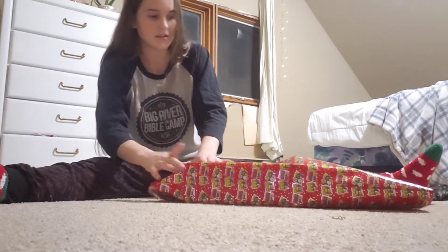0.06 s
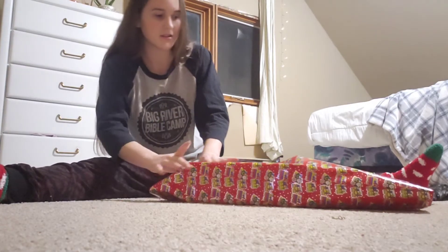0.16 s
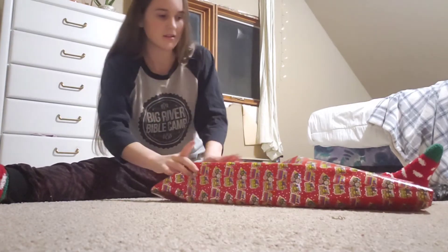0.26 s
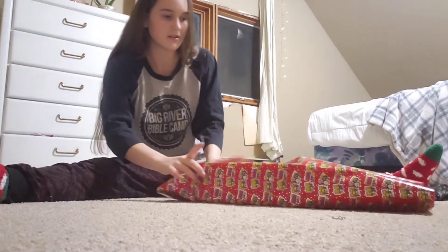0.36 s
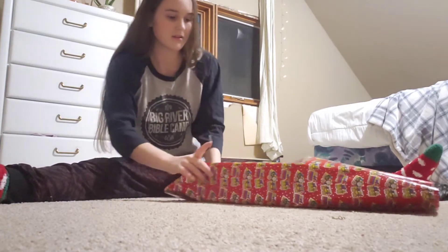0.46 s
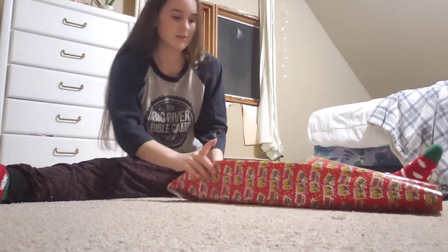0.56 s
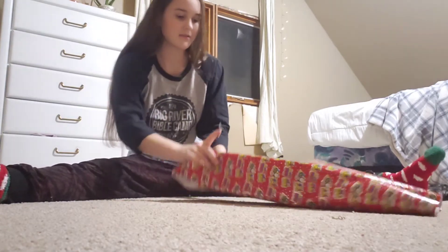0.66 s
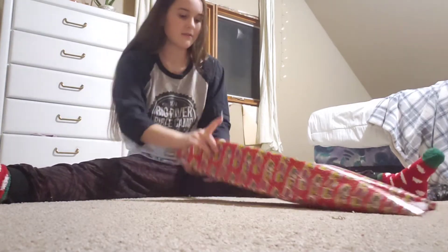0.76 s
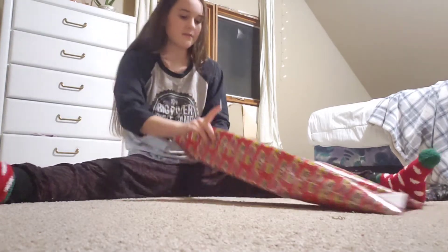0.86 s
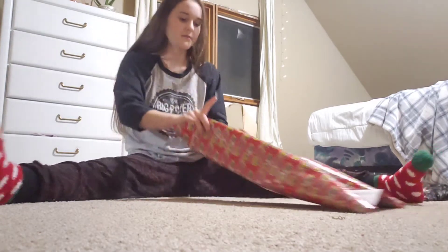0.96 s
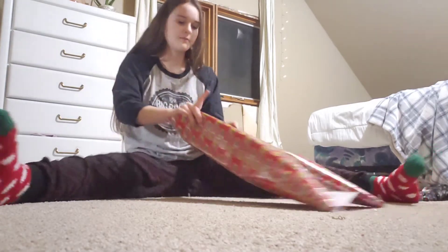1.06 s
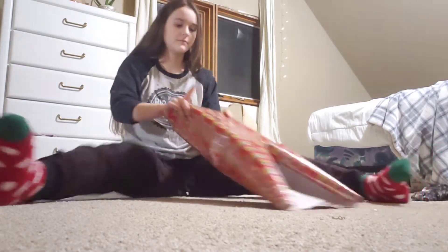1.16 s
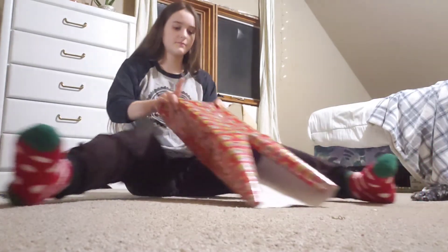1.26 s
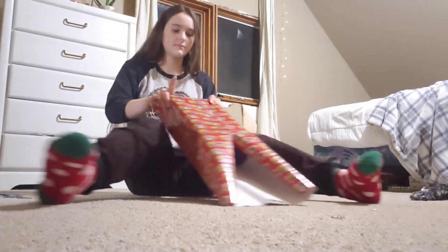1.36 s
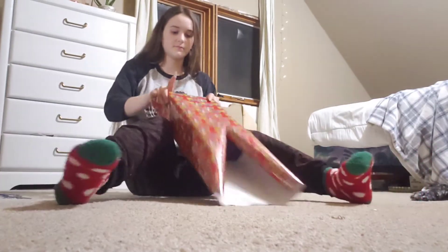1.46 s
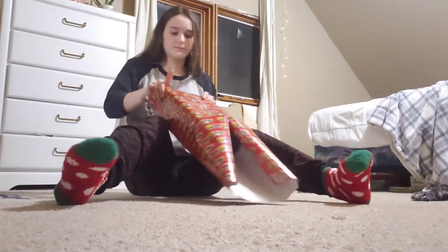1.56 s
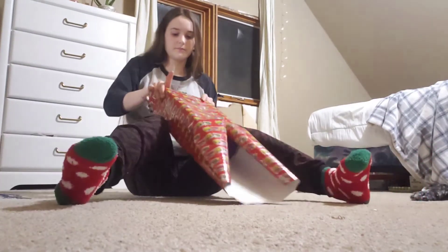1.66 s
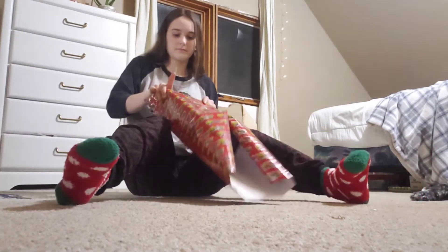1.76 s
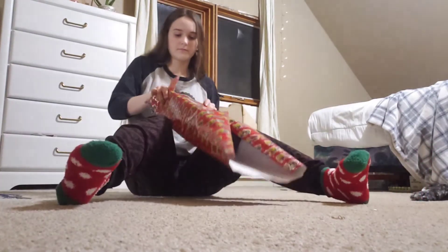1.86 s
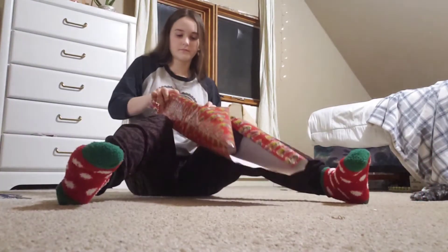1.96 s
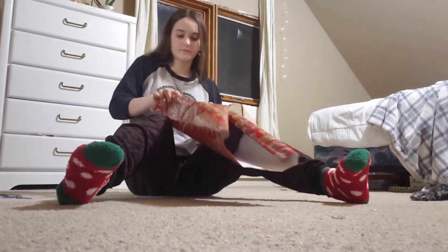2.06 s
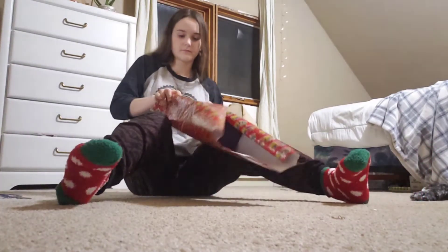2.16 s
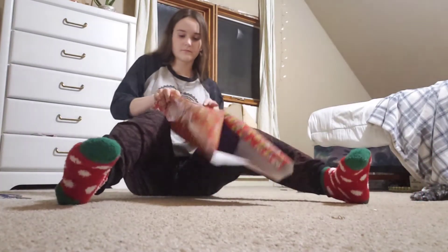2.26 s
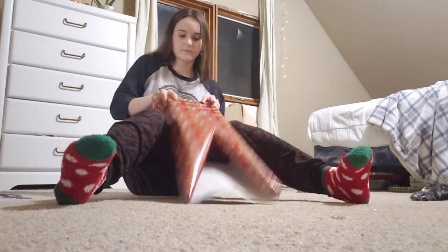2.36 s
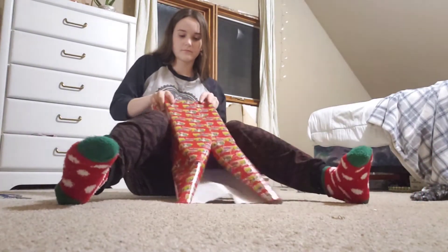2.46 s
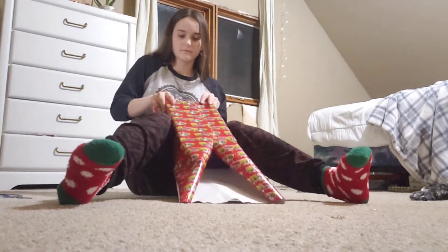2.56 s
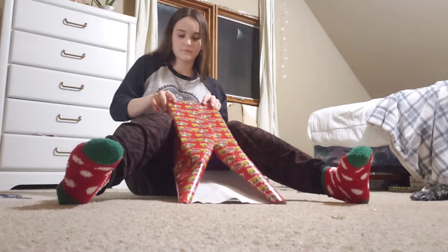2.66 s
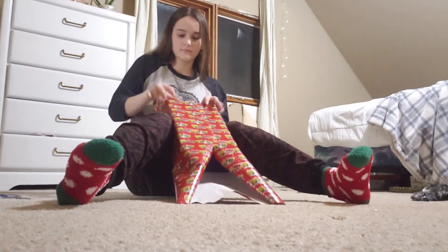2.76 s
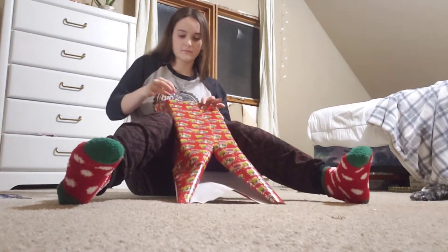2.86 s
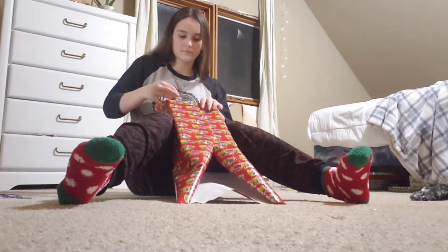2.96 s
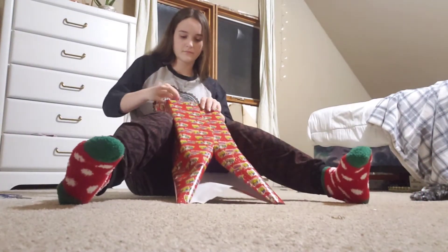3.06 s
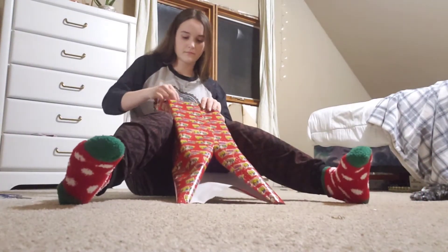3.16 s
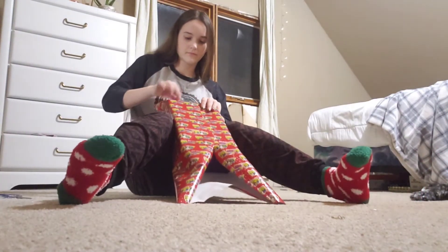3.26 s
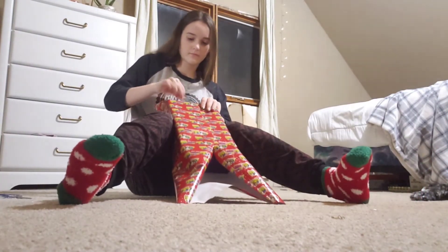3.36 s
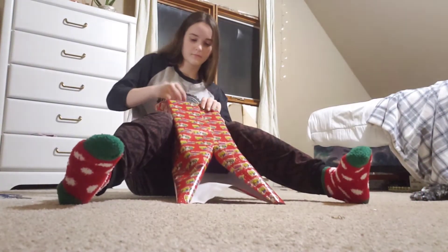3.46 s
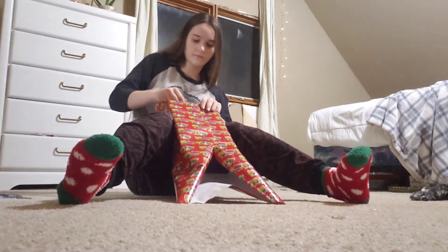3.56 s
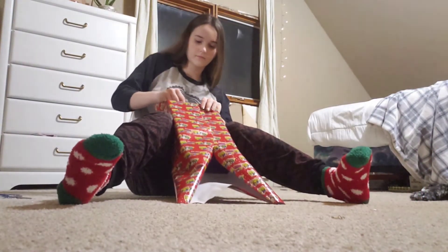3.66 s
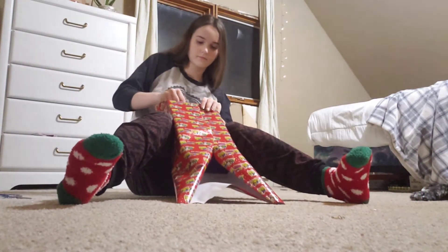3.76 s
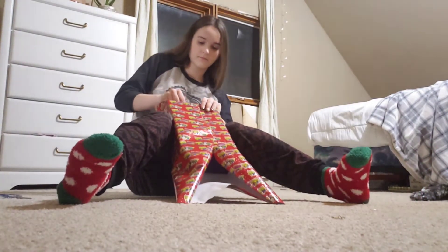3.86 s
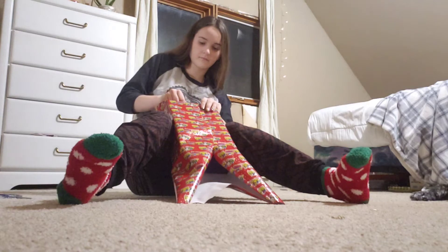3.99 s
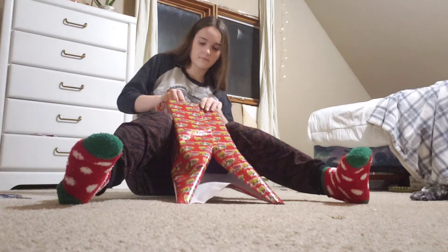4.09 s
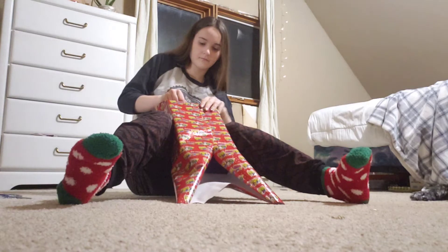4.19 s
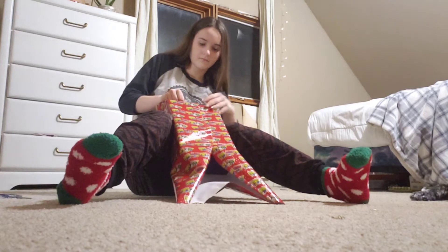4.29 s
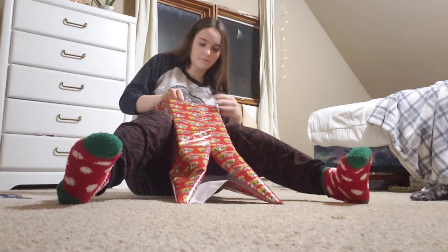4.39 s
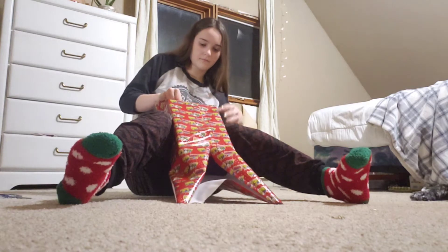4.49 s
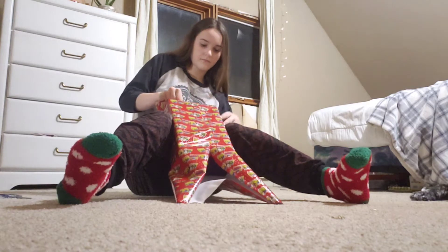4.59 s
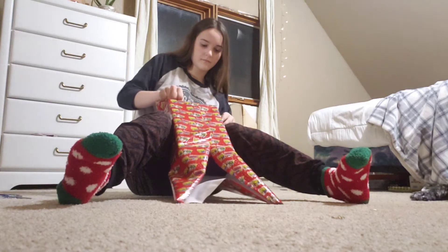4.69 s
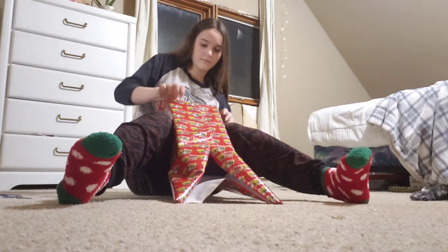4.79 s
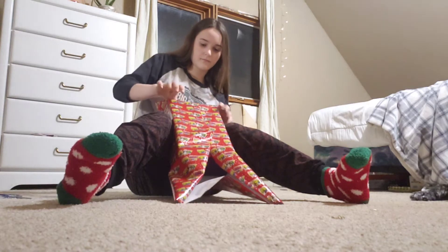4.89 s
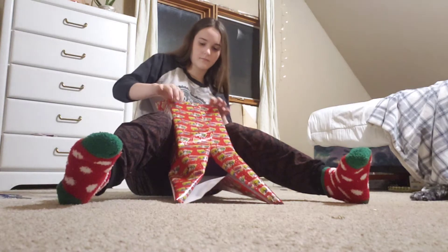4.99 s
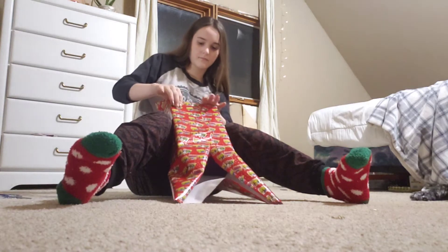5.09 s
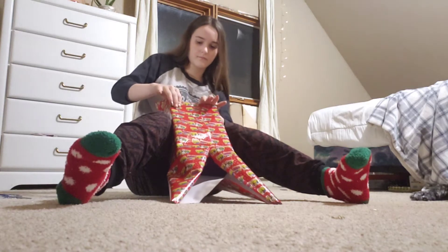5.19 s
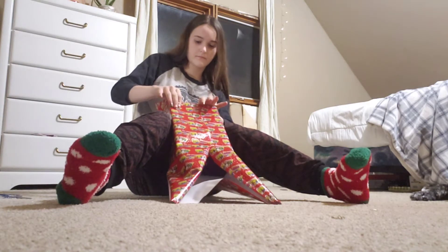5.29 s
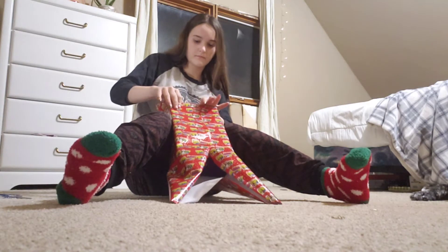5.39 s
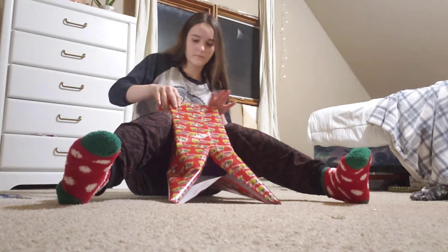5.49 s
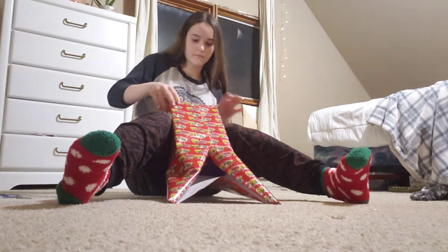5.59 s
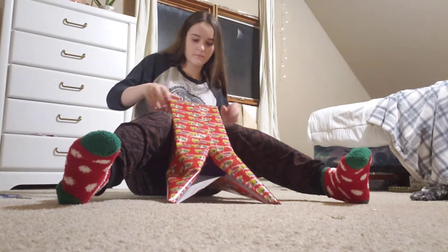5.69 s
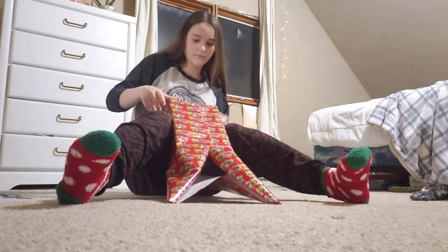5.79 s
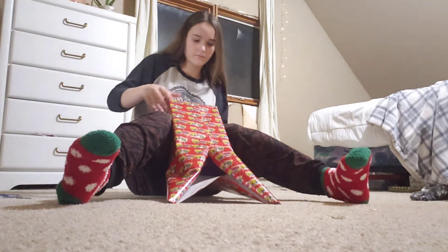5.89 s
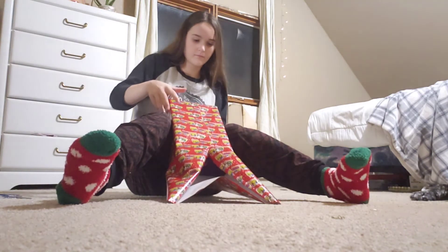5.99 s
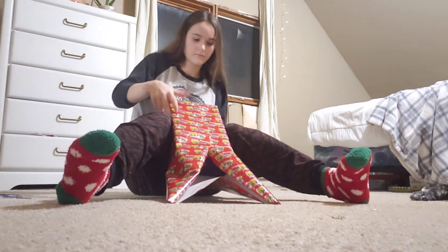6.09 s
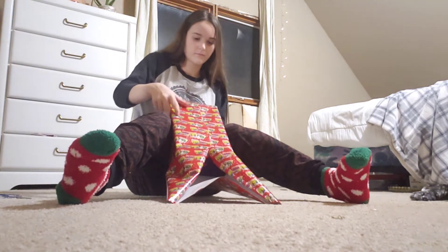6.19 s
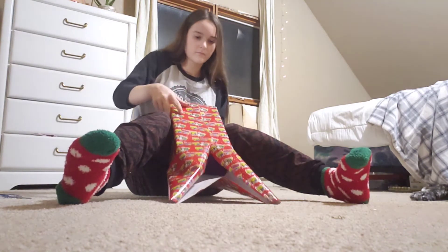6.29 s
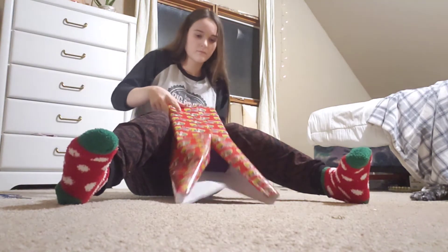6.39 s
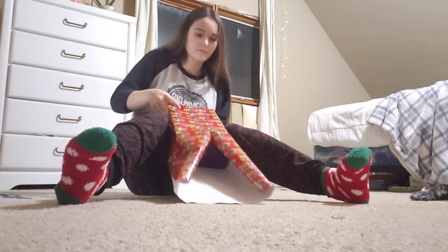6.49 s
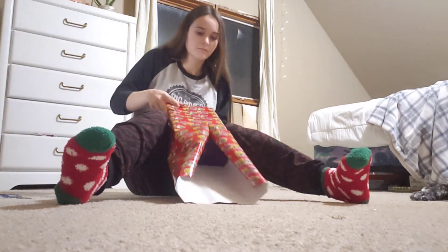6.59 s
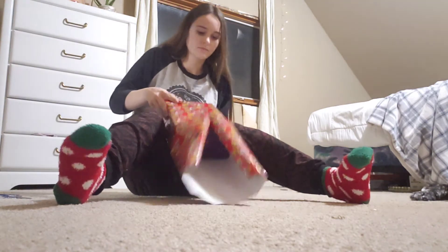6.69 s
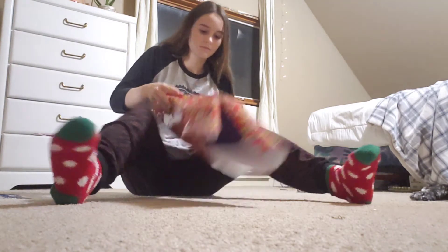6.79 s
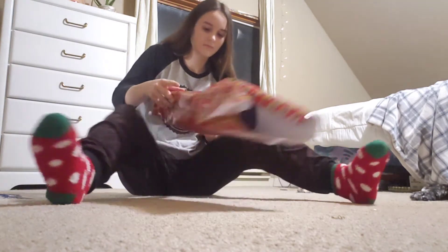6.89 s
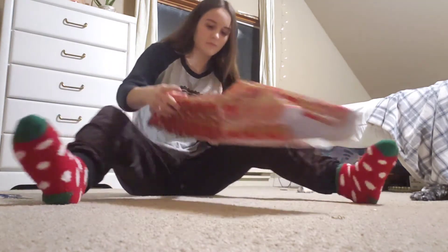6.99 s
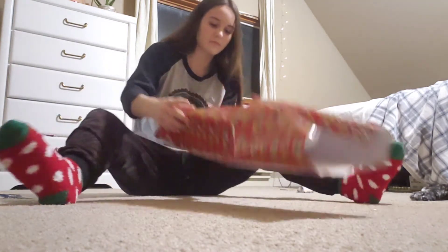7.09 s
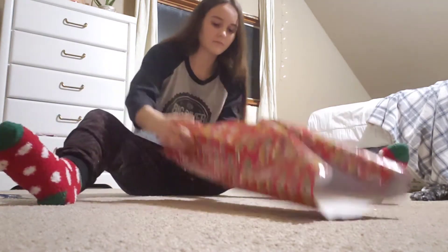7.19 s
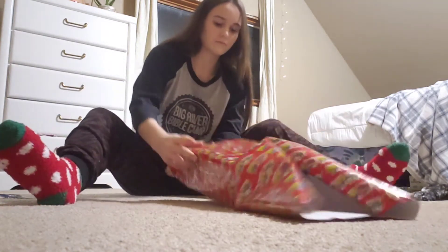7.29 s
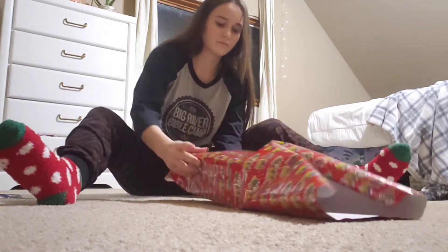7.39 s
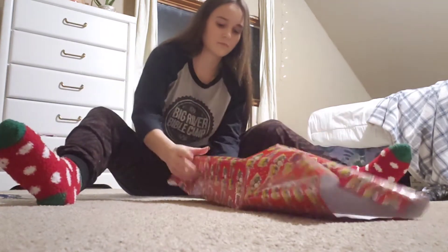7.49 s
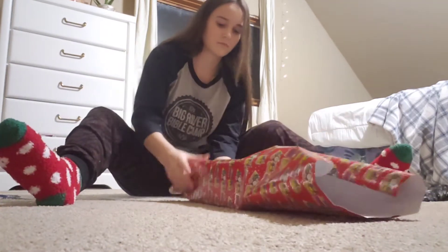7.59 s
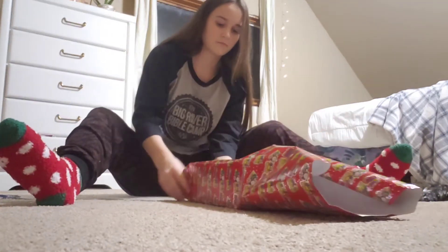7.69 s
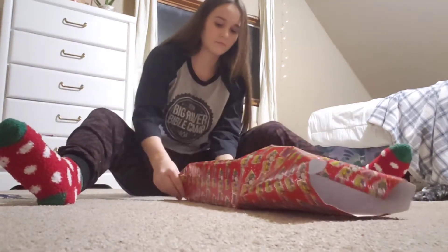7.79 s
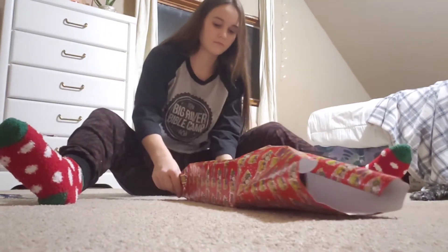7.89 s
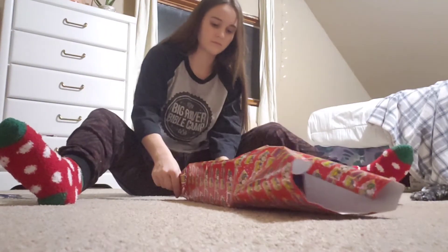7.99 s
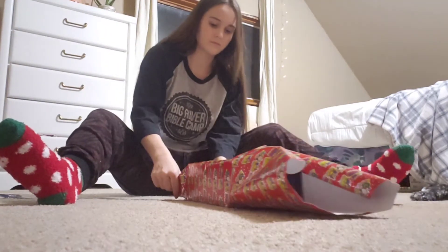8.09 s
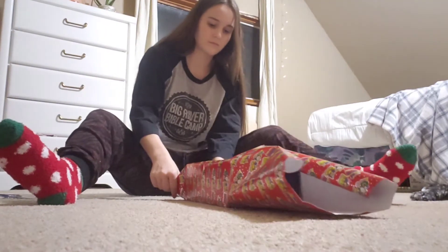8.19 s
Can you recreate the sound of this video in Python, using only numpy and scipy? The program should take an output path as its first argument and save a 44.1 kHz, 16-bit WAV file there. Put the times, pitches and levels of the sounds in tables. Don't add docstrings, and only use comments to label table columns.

```python
import sys
import numpy as np
from scipy import signal
from scipy.fft import rfft, irfft, next_fast_len
from scipy.io import wavfile
from scipy.ndimage import uniform_filter1d, map_coordinates

SR = 44100
rng = np.random.default_rng(int(sys.argv[2]) if len(sys.argv) > 2 else 0)


def natural_amplitude(level_db):
    exponent = np.asarray(level_db, float) / 20
    return 10 ** exponent


def bounce(signal):
    frames = np.transpose(np.atleast_2d(signal))
    limited = np.clip(frames, -1, 1)
    pcm = np.round(limited * 32767).astype(np.int16)
    wavfile.write(sys.argv[1], SR, pcm)


N = 363825


def unit(x):
    return x / np.sqrt(np.mean(x ** 2) + 1e-20)


def along(points, hz):
    f, v = np.transpose(points)
    return np.interp(np.log(hz + 1), np.log(f + 1), v)


def wobble(rate):
    return map_coordinates(rng.standard_normal(N // 100), [np.arange(N) * rate / SR])


def filtered(x, response):
    m = next_fast_len(x.shape[-1] + 8192)
    return irfft(rfft(x, m) * response(np.fft.rfftfreq(m, 1 / SR)), m)[..., :x.shape[-1]]


def paired(pair, alike):
    def mid_side(hz):
        turn = np.arccos(np.clip(along(alike, hz), -1, 1)) / 2
        return np.array([np.cos(turn), np.sin(turn)])
    mid, side = filtered(pair, mid_side)
    return np.array([mid + side, mid - side])


# (frequency [Hz], density [dB per Hz])
HISS_SPECTRUM = [(18, -38.5), (30, -5), (114, 1.5), (309, -7.5), (626, -6), (1340, -14), (3720, -18.5),
                 (7350, -21.5), (8370, -28), (12400, -14.5), (15700, -21)]
# (frequency [Hz], level [dB])
MAINS_HUM = [(118.4, -83)]


def background():
    hiss = filtered(rng.standard_normal((2, N)), lambda hz: natural_amplitude(along(HISS_SPECTRUM[:-1], hz)))
    hiss = unit(paired(hiss, [(100, 0.41), (600, 0.55), (2000, .05)]))
    t = np.arange(N) / SR
    hum = sum(natural_amplitude(db + 3 + 1.2 * wobble(6)) * np.sin(2 * np.pi * hz * t) for hz, db in MAINS_HUM)
    return natural_amplitude(-74) * hiss + hum


# (frequency [Hz], density [dB per Hz])
PAPER_SPECTRUM = [(18, -42), (35, -30), (70, -13.5), (170, -8.5), (450, -1.5), (800, -3), (1500, -7),
                  (3000, -11.5), (3400, -15), (5000, -19), (8200, -31.5), (10500, -33), (12300, -28),
                  (15700, -25.5)]
# (frequency [Hz], width [Hz], level [dB])
BOX_MODES = [(176, 28, 5), (285.3, 64, 5), (467, 78, -4.5), (609.4, 64, 3), (791, 82, -9), (979, 93, 4)]
REGISTER_EDGES = [6000, 1300, 250]


def registers(hz):
    below = [1 / (1 + (hz / edge) ** 4) for edge in REGISTER_EDGES]
    hollow = natural_amplitude(-4.0)
    for k, (centre, width, db) in enumerate(BOX_MODES):
        damping = 1j * hz * width
        hollow = hollow + (-1) ** k * natural_amplitude(db) * damping / (centre ** 2 - hz ** 2 + damping)
    shares = [1 - below[0],
              below[0] * (1 - below[1]),
              below[1] * (1 - below[2]) * hollow,
              below[2]]
    colour = natural_amplitude(along(PAPER_SPECTRUM, hz))
    return np.array([unit(colour * np.abs(s)) * np.exp(1j * np.angle(s)) for s in shares])


def crackles(per_second, spread_db, clump_db, slide_db):
    chance, size, sign = rng.random(N), rng.exponential(1, N), rng.standard_normal(N)
    ticks = (chance < per_second / SR) * natural_amplitude(spread_db * np.minimum(size, 2.4)) * sign
    bed = unit(ticks) + natural_amplitude(slide_db) * rng.standard_normal(N)
    starts = (rng.random(N) < 45 / SR) * rng.exponential(1, N)
    dying = natural_amplitude(-60 * np.arange(4000) / SR / 0.079)
    runs = signal.fftconvolve(starts, dying)[:N]
    return unit(bed * (1.53 + runs) * natural_amplitude(clump_db * wobble(70)))


# (offset [dB], share of weight [ratio], growth [ratio])
REGISTER_ANSWER = [(3.5, 0.011, 1.01), (-5.5, 0.82, 1.395), (0.83, 1.053, 0.92), (-11, 1.414, 1.07)]


def moves(rows, rise_db_per_s, fall_db_per_s):
    start, hold, db, weight_db = np.transpose(rows)[:, :, None]
    usual_db = -52
    t = np.arange(0, N + 64, 64) / SR
    early, late = np.maximum(start - t, 0), np.maximum(t - start - hold, 0)
    shape_db = -rise_db_per_s * early - fall_db_per_s * late
    powers = []
    for offset_db, share, growth in REGISTER_ANSWER:
        peak_db = usual_db + growth * (db - usual_db) + offset_db + share * weight_db
        power = (natural_amplitude(shape_db + peak_db) ** 2).sum(axis=0)
        powers.append(np.interp(np.arange(N) / SR, t, power))
    return np.array(powers)


# (time [s], strength [dB], weight [dB])
JERKS = [(.01, -61, 3), (0.149, -51.5, 6), (0.251, -51.5, 2), (.435, -51, -6), (0.519, -54, 16),
         (.678, -59, -2), (1.163, -37.5, -4), (1.246, -48.5, 12), (1.337, -50, -22), (1.497, -59, 16.5),
         (1.812, -57, -4), (1.932, -61.5, 9.5), (1.961, -51, 3), (2.116, -38.5, -35), (2.463, -34, 1.5),
         (2.52, -52, 10.5), (2.631, -69, 19.5), (2.81, -51, 8), (3.142, -47.5, 3), (3.192, -45.5, 2.5),
         (3.256, -52.5, 10), (4.781, -65.5, 15), (5.866, -89.5, 15), (7.1, -69, 26), (7.337, -50, 19.5),
         (7.787, -35, -8), (7.85, -54, -3)]
# (time [s], hold [s], strength [dB], weight [dB])
LIFTING_PULLS = [(0.052, 0.21, -66, 6.5), (0.238, 0.29, -55, -3), (0.511, 0.15, -56.5, 4.5),
                 (0.757, 0.078, -51.5, 8.5), (0.929, 0.12, -51, 1.5), (1.171, 0.03, -52, 9.5),
                 (1.407, 0.13, -47.5, 0), (1.6, 0.078, -49, 5), (1.788, 0.039, -52.5, 12.5),
                 (2.039, 0.11, -55, 3), (2.257, 0.11, -60, 8.5), (2.471, 0.062, -43, 3.5),
                 (2.727, 0.032, -50.5, 2), (2.904, 0.071, -57.5, -1.5), (3.027, 0.0092, -54.5, 7.5),
                 (3.192, 0.011, -45.5, -18)]
# (time [s], hold [s], strength [dB], weight [dB])
SHEET_RELEASES = [(3.46, 0.016, -65, -33), (3.727, 0.061, -71.5, 0.5), (4.048, 0.12, -69, -3),
                  (4.937, 0.0087, -63, -9), (5.072, 0.093, -64.5, 9), (5.357, 0.035, -65, 10),
                  (6.045, 0.01, -81.5, 12), (6.104, 0.14, -84.5, 19.5), (.495, .02, -62.5, 11),
                  (6.662, 0.033, -49, 3), (7.134, 0.016, -45.5, 4), (2.883, 0.034, -46, -13),
                  (8.105, 0.044, -65, -10)]
# (time [s], hold [s], strength [dB], weight [dB])
PARCEL_HEAVES = [
    (1.485, 0.056, -53.5, 16),
    (7.06, 0.023, -60, 14),
    (4.86, 0.065, -80.5, 11.5),
    (6.57, 0.044, -64, 8),
    (0.71, 0.1, -61, 4),
    (6.93, 0.065, -61.5, 5.5),
    (1.3, 0.1, -52, -3.5),
    (1.4, 0.012, -61.5, 14),
]
# (time [s], hold [s], strength [dB], weight [dB])
TUCKING_PULLS = [
    (3.578, 0.058, -91, 12.5),
    (4.31, 0.048, -54, -1),
    (4.414, 0.14, -56, 0.5),
    (4.68, .006, -53, -2),
    (4.729, 0.03, -51, 0),
    (4.97, 0.01, -65, -14),
    (5.159, 0.015, -53.5, -2),
    (5.408, 0.066, -52.5, -0.5),
    (5.587, 0.061, -56.5, 2),
]
# (time [s], hold [s], strength [dB], weight [dB])
TURNING_PULLS = [(6.259, 0.012, -52.5, 1), (6.392, 0.06, -46, 2), (6.529, 0.015, -57.5, 15.5),
                 (6.69, 0.093, -52, 7.5), (6.92, 0.0023, -60, 6), (7.02, 0.13, -59.5, 6.5),
                 (7.143, 0.0029, -66, 2), (7.268, 0.03, -51.5, 3), (7.357, 0.03, -50, 10),
                 (7.532, 0.0045, -46.5, 8), (7.641, 0.018, -45, 3.5), (7.703, 0.071, -49.5, 4),
                 (7.831, 0.0057, -43, 3.1), (7.967, 0.011, -50, 1.5), (8.206, 0.03, -46.5, 1)]


def handling():
    pulls = moves(LIFTING_PULLS + TUCKING_PULLS + TURNING_PULLS + PARCEL_HEAVES, 199.5, 208)
    pulls = pulls + moves(SHEET_RELEASES, 6000, 208)
    tugs = moves([(s, 0, db, weight_db) for s, db, weight_db in JERKS], 693, 354.5)
    creases = LIFTING_CREASES + FOLDING_CREASES + TURNING_CREASES
    tugs = tugs + moves([(s, 0, db - 27, blunt_db + 2) for s, db, blunt_db in creases], 6000, 605)

    fine = crackles(1100, spread_db=4.5, clump_db=1.5, slide_db=2.5)
    crisp = crackles(600, spread_db=3.5, clump_db=1.5, slide_db=-5)
    crackle = fine + 0.46 * crisp
    rustle = 2.4 * fine + 0.21 * crisp
    box = 0.63 * fine + 0.69 * crisp
    flap = rng.standard_normal(N)
    layers = filtered(np.array([crackle, rustle, box, flap]), registers)
    effort = np.sqrt(np.abs(uniform_filter1d(layers ** 2, size=3200)) + 1e-9)
    return (np.sqrt(pulls + tugs) * layers / effort).sum(axis=0)


def knocks(events, turns, puff):
    out, t = np.zeros(N + 9000), np.arange(9000) / SR
    for s, db, hz in events:
        air = uniform_filter1d(rng.standard_normal(len(t)), size=int(SR / hz / 3))
        air = unit(air - uniform_filter1d(air, size=int(SR / hz)))
        shape = (1 - np.exp(-t * hz * 0.79)) * natural_amplitude(-60 * t * hz / turns)
        ring = np.sin(2 * np.pi * hz * t) + puff * air
        out[round(s * SR):][:len(t)] += natural_amplitude(db + 8.0) * shape * ring
    return out[:N]


# (time [s], level [dB], pitch [Hz])
PANEL_POPS = [(0.014, -45, 1090), (0.514, -51, 800), (1.63, -31.5, 746), (1.845, -26, 814),
              (1.927, -32.5, 582), (2.003, -38.5, 724), (2.475, -25, 867), (7.134, -32, 1287),
              (8.105, -30.5, 1800), (3.726, -58, 813), (7.629, -28.5, 820), (7.733, -32, 1960),
              (7.821, -23, 1690), (7.885, -25.5, 970), (7.977, -32, 1800)]


def pops():
    return knocks(PANEL_POPS, turns=15.0, puff=0.59)


# (time [s], level [dB], bluntness [dB])
LIFTING_CREASES = [(0.1306, -38, -19), (0.2472, -34, -4), (0.402, -30.5, -19), (0.4304, -20.5, -13),
                   (0.5342, -36, -3), (0.5477, -21.5, -16), (0.6145, -28.5, -1.5), (0.7497, -48, 16),
                   (0.7632, -38, 15.5), (0.9796, -24, -20), (1.035, -25.5, -3), (1.1247, -31, -2),
                   (1.1606, -5, -15), (1.3495, -32, -3.5), (1.4294, -28.5, -16), (1.491, -52, 2),
                   (1.6031, -17, 0), (1.7215, -40.5, 11.5), (1.7477, -30.5, 0), (1.7665, -24.5, 3.5),
                   (1.8055, -12.5, -11), (1.8487, -38, 3), (1.9258, -36, 8.5), (2.0265, -25.5, -7),
                   (2.0798, -24, -14.5), (2.1151, -18.5, -13)]
# (time [s], level
# [dB], bluntness [dB])
STRAY_CRACKS = [(0.468, -32, 3), (0.67, -45, 12), (1.1556, -6.5, -6.5), (1.1752, -14.5, -21),
                (1.5917, -17, -11), (1.959, -42, -5), (3.18, -28, -5), (3.563, -54.5, -4),
                (3.7264, -58, -15), (4.0474, -57.5, -10), (4.0954, -52, -9), (4.143, -48, -22),
                (4.268, -38, -30), (4.459, -43.5, 8.5), (4.972, -34, -19), (5.324, -48, -24),
                (6.046, -65, 0), (6.1034, -67.5, -10), (6.791, -32, 1), (6.904, -36, 2),
                (7.0758, -32.5, -12), (7.733, -34, 6), (7.837, -23, -5), (8.176, -22, -24),
                (0.1462, -37, -6), (0.8989, -33, -2), (1.1476, -25, 7), (1.6299, -34, -13),
               (2.2433, -59, -10), (2.4547, -21, -18), (2.4647, -25, -10), (2.475, -14, -8),
               (2.525, -25, 2), (2.809, -43, -8), (2.9075, -44, -13), (2.9314, -33, -4),
               (3.4605, -31.5, -26), (4.4457, -49, -1), (4.573, -54, -6), (5.1058, -54, -5),
               (6.5131, -51, -8), (6.5547, -58, -10), (6.7103, -23.5, -1), (6.8713, -60, -6),
               (7.4, -23, -9), (7.4782, -49, -6), (7.6886, -25, -14), (7.8216, -24, -10), (7.8418, -13, -4),
               (7.8858, -27, -1)]
# (time [s], level [dB], bluntness [dB])
FOLDING_CREASES = [(2.3397, -38.5, 8.5), (2.405, -38.5, 11), (2.429, -50, -2), (2.4512, -14, -19),
                   (2.5137, -21, -1), (2.7108, -30.5, -1), (2.79, -22.5, 3), (2.8828, -31, 4.5),
                   (2.972, -28, -3.5), (3.0211, -21.5, -26), (3.1288, -46, 14), (3.1943, -24.5, -0.5),
                   (3.2521, -21, -18), (4.318, -37, -28), (4.33, -30, -19), (4.388, -42, 3),
                   (4.5102, -30, -0.5), (4.5396, -36, 2), (4.6567, -27, -9), (4.7249, -33.5, -8),
                   (4.7446, -32, -12), (4.9375, -49.5, -3), (5.078, -42, 6), (5.2766, -41, -24),
                   (5.3577, -36, -27), (5.3822, -32.5, -14), (5.4075, -38, -16), (5.4347, -33, -6),
                   (5.5954, -25, -17)]
# (time [s], level [dB], bluntness [dB])
TURNING_CREASES = [(6.2395, -35.5, 2.5), (6.3452, -37, 10), (6.36, -35, 9.5), (6.405, -24, -4),
                   (6.4351, -24, -5), (6.6731, -27, -10), (6.979, -39.5, 8.5), (7.029, -28, -8),
                   (7.1373, -18.5, -12), (7.222, -23.5, 0.5), (7.324, -24.5, -10), (7.3408, -17, -26),
                   (7.4307, -24.5, -11), (7.501, -37, -10), (7.5228, -19, -4), (7.542, -22.5, -10),
                   (7.6504, -17.5, -24), (7.724, -22, 10), (7.7824, -19, -7), (7.8053, -23.5, -6),
                   (7.8457, -9.5, -12), (7.913, -30, 2), (7.9446, -32, -4), (7.9763, -31, 7.5),
                   (8.1043, -18.5, -14), (8.1674, -28, -7)]


def snaps():
    out, t = np.zeros((4, N + 800)), np.arange(800) / SR
    creep = (1 - np.exp(-(t / .0011) ** 2)) * natural_amplitude(-60 * t / .016)
    crack_at = round(.0013 * SR)
    creases = LIFTING_CREASES + FOLDING_CREASES + TURNING_CREASES
    for s, db, blunt_db in creases + STRAY_CRACKS:
        spikes = rng.standard_normal((2, len(t))) * natural_amplitude(1.1 * rng.standard_normal(len(t)))
        sharp, blunt = (unit(b) for b in spikes * creep)
        sharp[crack_at] += natural_amplitude(8) * np.sign(spikes[1, 0])
        at = round((s - .0004) * SR)
        crackle = sharp - 0.25 * np.roll(sharp, 1)
        rustle = 1.2 * sharp + 0.15 * blunt
        out[0, at:at + len(t)] += natural_amplitude(db - 17.0) * crackle
        out[1, at:at + len(t)] += natural_amplitude(db + blunt_db - 20.5) * rustle
        out[2, at + 50] += natural_amplitude(db + 7 + 0.55 * blunt_db) * np.sign(spikes[0, 0])
    return filtered(out[:, :N], registers).sum(axis=0)


# (time [s], level [dB], pitch [Hz])
BOX_BUMPS = [(.15, -55, 170), (1.33, -45.5, 55), (3.345, -48, 223), (3.459, -49.5, 169), (3.74, -56, 176),
             (4.1, -56, 230), (4.451, -52, 111), (5.08, -39, 250), (5.401, -41, 173.5), (7.15, -45.5, 66.1),
             (7.719, -32.5, 176), (8.21, -40, 130)]


def bumps():
    return knocks(BOX_BUMPS, turns=9.1, puff=0.58)


# (time [s], level [dB], pitch [Hz])
PANEL_FLICKS = [(0.429, -36, 426), (0.51, -23, 466), (0.534, -27, 452), (0.614, -32, 452),
                (0.764, -25, 1020), (0.979, -45, 450), (1.035, -32, 600), (1.577, -28, 430),
                (1.635, -20, 458), (1.72, -37, 676), (1.746, -28, 463), (1.77, -28, 450), (1.926, -28, 511),
                (2.004, -34, 538), (2.026, -35, 660), (2.072, -42, 748), (2.098, -29, 579),
                (2.243, -33, 934), (2.456, -6.5, 1760), (2.465, -16, 540), (2.475, -23, 420),
                (2.512, -33, 797), (2.523, -31, 579), (2.787, -40, 1050), (2.882, -35, 1560),
                (2.933, -37, 891), (3.191, -31, 463), (4.804, -47, 796), (5.076, -37, 437),
                (5.17, -35, 506), (6.045, -55, 536), (6.103, -54.5, 445), (6.13, -50, 468),
                (6.176, -49, 770), (6.235, -37, 816), (7.131, -25, 528), (7.715, -38, 474),
                (7.722, -21, 1490), (7.734, -25, 650), (7.808, -30, 1740), (7.821, -25, 589),
                (7.884, -23, 630), (8.104, -18.5, 1780), (8.166, -27, 2990), (8.235, -38, 1710),
                (1.126, -26, 600), (1.1555, -23, 900), (1.1603, -17.5, 1200), (1.177, -20, 650),
                 (1.531, -22, 480), (1.603, -21, 1560), (1.781, -19, 700), (1.8052, -15, 1500),
                 (1.8465, -12.5, 696), (1.8490, -12, 950), (7.6305, -18, 750), (7.5215, -23, 900),
                 (6.362, -31, 1600), (6.793, -31, 800), (6.906, -32, 800)]


def flicks():
    out, t = np.zeros(N + 1500), np.arange(1500) / SR
    for s, db, hz in PANEL_FLICKS:
        swing = np.sin(2 * np.pi * hz * t) + 0.13 * np.sin(2 * np.pi * 2.3 * hz * t)
        out[round(s * SR):][:len(t)] += natural_amplitude(db - 6.5 - 60 * t * hz / 5) * swing
    return out[:N]


# (time [s], level [dB], pitch [Hz])
WALL_DENTS = [(0.43, -30.5, 426), (0.493, -30, 460), (0.553, -24.5, 427), (0.748, -26.5, 557),
              (0.914, -28, 477), (1.035, -22.5, 645), (1.107, -40, 446), (1.124, -27, 540),
              (1.236, -45, 412), (1.462, -28, 493), (1.505, -32, 440), (1.566, -25.5, 480),
              (1.721, -41, 684), (1.803, -33.5, 302), (2.083, -28, 730), (2.243, -28.5, 915),
              (2.274, -27, 960), (2.708, -25, 550), (2.931, -28.5, 880), (3.136, -29.5, 750),
              (3.186, -22.5, 448), (3.249, -28.5, 774), (4.363, -58, 575), (4.414, -40, 580),
              (4.486, -40, 513), (4.57, -36, 500), (4.658, -29.5, 870), (5.423, -41, 820),
              (6.107, -44.5, 456), (6.434, -37, 455), (6.712, -27, 413), (6.788, -36, 453),
              (6.904, -28, 791), (7.059, -28, 540), (7.221, -42, 1030), (7.284, -37, 450),
              (7.302, -31, 454), (7.331, -17, 493), (7.52, -29.5, 450), (7.681, -28, 523),
              (7.782, -22, 654)]


def dents():
    return natural_amplitude(-3.5) * knocks(WALL_DENTS, turns=12, puff=0.27)


# (time [s], level [dB], pitch [Hz])
PARCEL_THUDS = [
    (.512, -33, 187),
    (.795, -41, 82),
    (6.523, -30.5, 205.4),
    (6.535, -31, 161),
    (7.325, -23, 125),
    (7.34, -29, 50.4),
]


def thuds():
    return knocks(PARCEL_THUDS, turns=6.5, puff=0.76)


# (time [s], level [dB])
COAT_SPARKS = [(1.1554, -19), (1.1621, -15), (1.8064, -10), (2.1153, -34), (2.8828, -18.5), (3.1925, -9.5),
               (3.4593, -35), (5.5947, -39), (7.1337, -16), (7.339, -28), (7.43, -22), (7.8476, -19),
               (8.105, -29)]
# (time [s], level [dB])
RUN_AND_LONE_SPARKS = [
    (3.4580, -16),
    (3.4597, -5),
    (3.4615, -16),
    (3.4645, -18),
    (3.4695, -20),
    (1.1614, -1),
    (1.8056, -9),
]


def sparks():
    s, db = np.transpose(COAT_SPARKS)
    blows = np.bincount(np.round(s * SR).astype(int), natural_amplitude(db + 13.5), minlength=N)
    for at, blow_db in RUN_AND_LONE_SPARKS:
        blows[round(at * SR)] += natural_amplitude(blow_db)
    return filtered(blows, lambda hz: 1 / (1 + (11760 / (hz + 1)) ** 8))


# (frequency [Hz], left-right likeness [ratio])
PORT_LIKENESS = [(60, 1), (130, 0.93), (290, 0.78), (450, 0.64), (640, 0.22), (1410, 0.099), (3100, 0.034),
                 (6820, 0.024), (15000, 0.025)]
# (frequency [Hz], decay by 60 dB [s])
ROOM_DECAY = [(150, 0.53), (600, 0.18), (3000, 0.3), (12000, 0.21)]


def paths():
    t = np.arange(SR // 4) / SR
    near = rng.standard_normal((2, len(t))) * natural_amplitude(-60 * t / 0.0049)
    near[[0, 1], [0, 2]] += 5 * np.sign(near[:, 0])
    hz, frames, z = signal.stft(rng.standard_normal((2, len(t))), SR, nperseg=256)
    decay = natural_amplitude(-60 * frames / along(ROOM_DECAY, hz)[:, None])
    tail = signal.istft(z * decay, SR, nperseg=256)[1][:, :len(t)]
    tail = tail * (1 - np.exp(-(t / 0.0015) ** 2))
    both = near / np.linalg.norm(near[0]) + natural_amplitude(-9.5) * tail / np.linalg.norm(tail[0])
    heard = rfft(paired(np.pad(both, ((0, 0), (256, 0))), PORT_LIKENESS))
    broad = uniform_filter1d(np.abs(heard) ** 2, size=22)
    return irfft(heard / np.sqrt(broad + 1e-6))


def room(x):
    hop = SR // 16
    out, fade = np.zeros((2, N + SR)), np.hanning(2 * hop + 1)[:-1]
    x = np.pad(x, (hop, 2 * hop))
    for at in range(0, N + hop, hop):
        heard = signal.fftconvolve((x[at:at + 2 * hop] * fade)[None], paths(), axes=1)
        out[:, at:at + heard.shape[1]] += heard
    return out[:, hop + 256:][:, :N]


def scene():
    paper = handling() + pops() + snaps() + bumps() + dents() + thuds() + sparks()
    flick = flicks()
    straight = np.array([np.roll(flick, round(.00007 * SR)), flick])
    return room(paper + natural_amplitude(-6) * flick) + straight + background()


def low_pass(x):
    return signal.sosfilt(signal.butter(12, 16830, fs=SR, output="sos"), x)


# (frequency [Hz], left minus right [dB])
PORT_COLOUR = [(30, 4.5), (60, -2.5), (99, 1), (160, -3.5), (270, -1.5), (450, 4), (740, -8), (1220, 4.5),
               (2010, 5), (3330, 4), (5500, 6), (9080, -4.5), (15000, -8)]


def record(dry):
    def ports(hz):
        limit = natural_amplitude(-53.5) + 1 / (1 + (hz / 15630) ** 300)
        return natural_amplitude(along(PORT_COLOUR, hz) * [[.5], [-.5]]) * limit
    return low_pass(filtered(dry, ports))


dry = scene()
out = record(dry)
bounce(out)
```